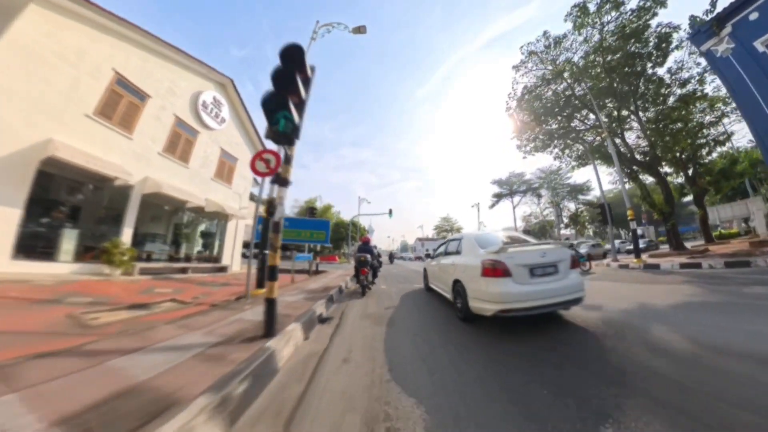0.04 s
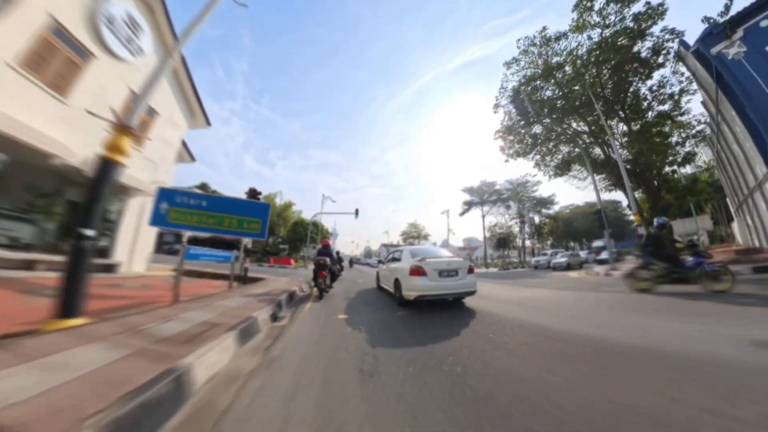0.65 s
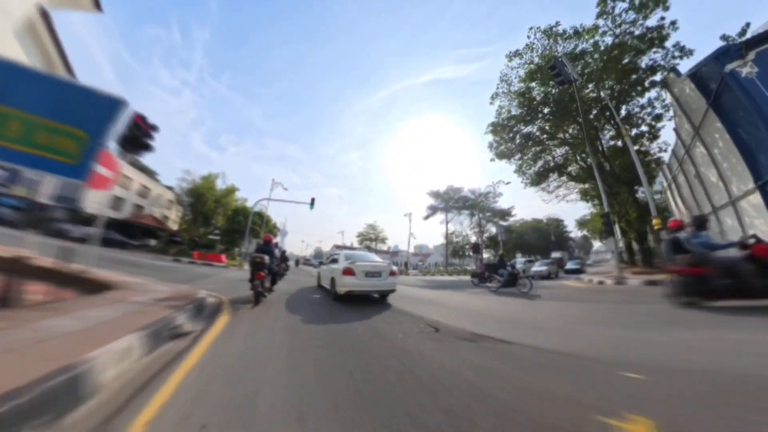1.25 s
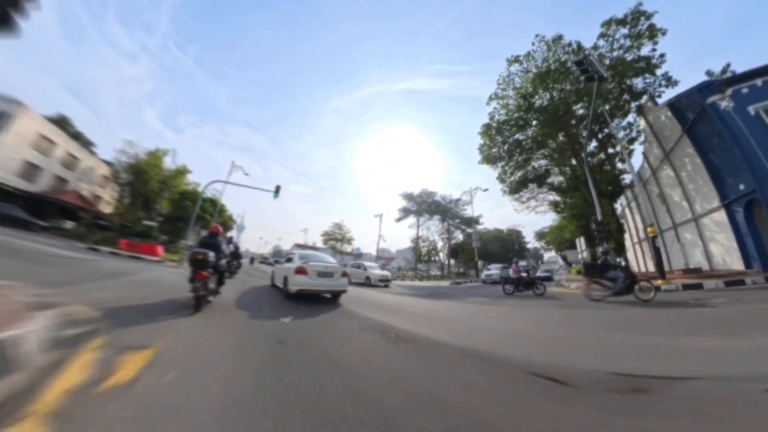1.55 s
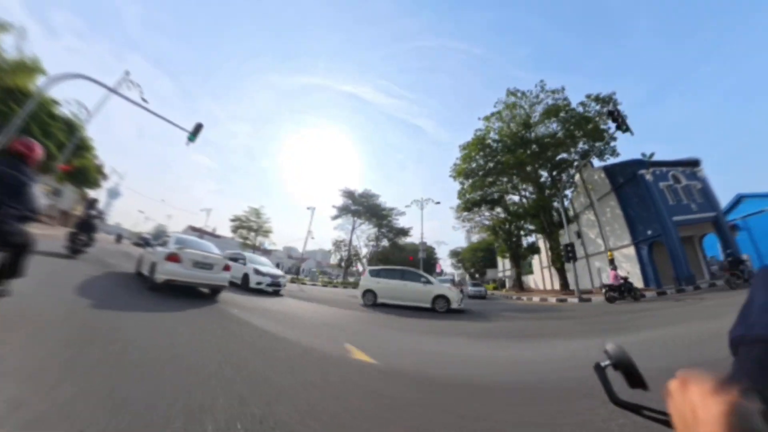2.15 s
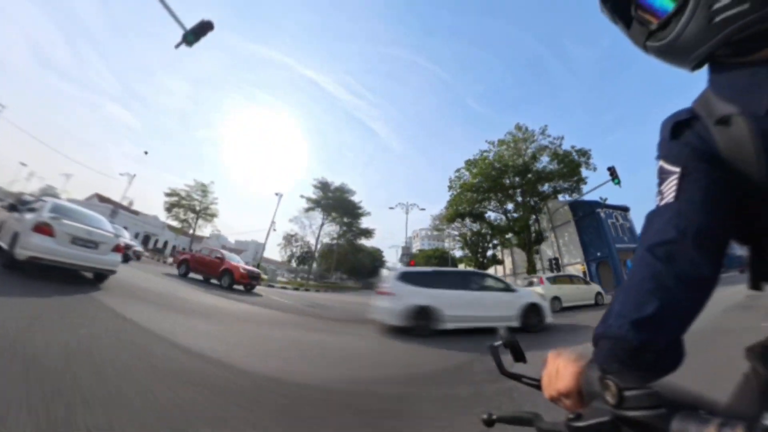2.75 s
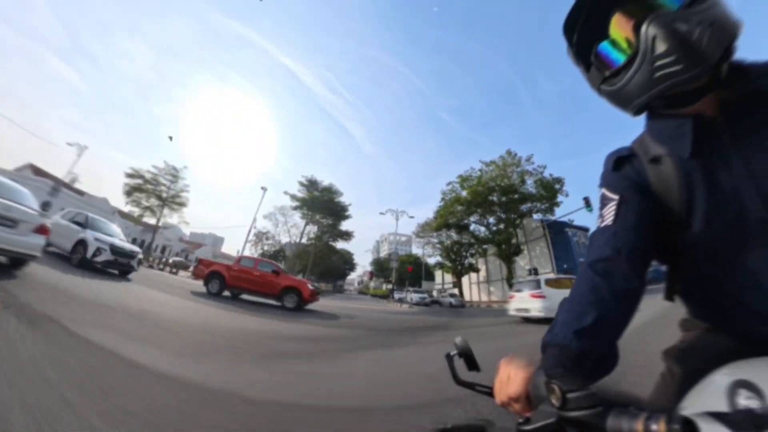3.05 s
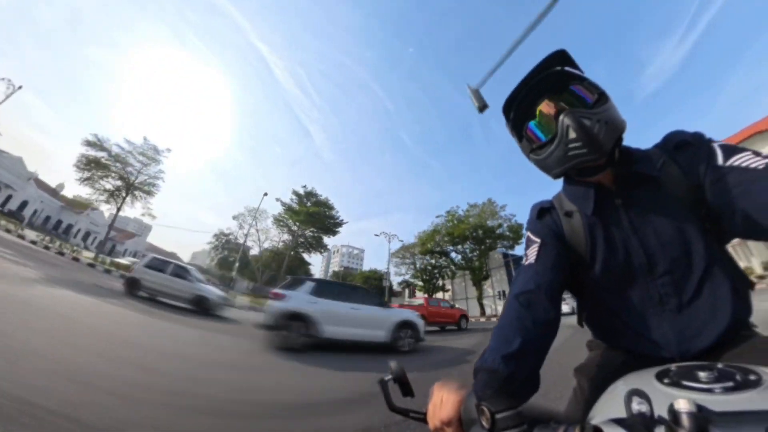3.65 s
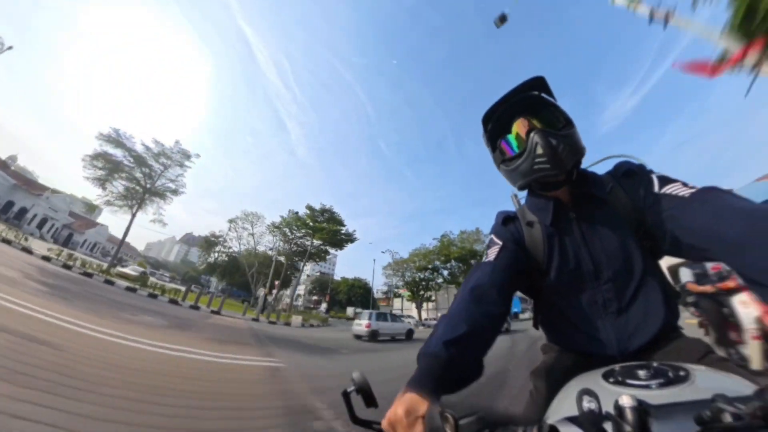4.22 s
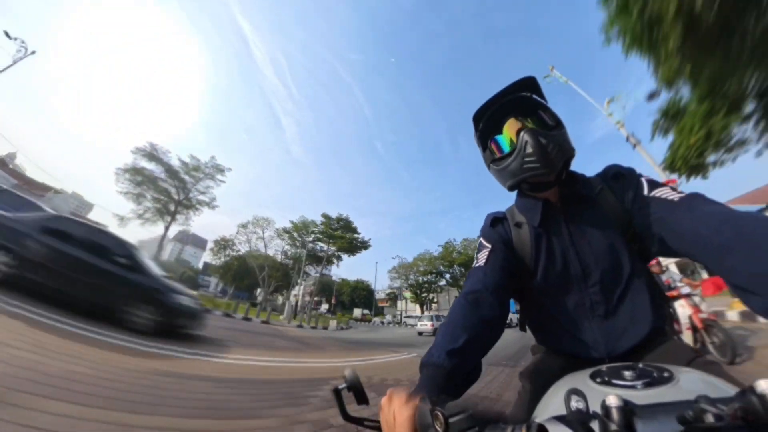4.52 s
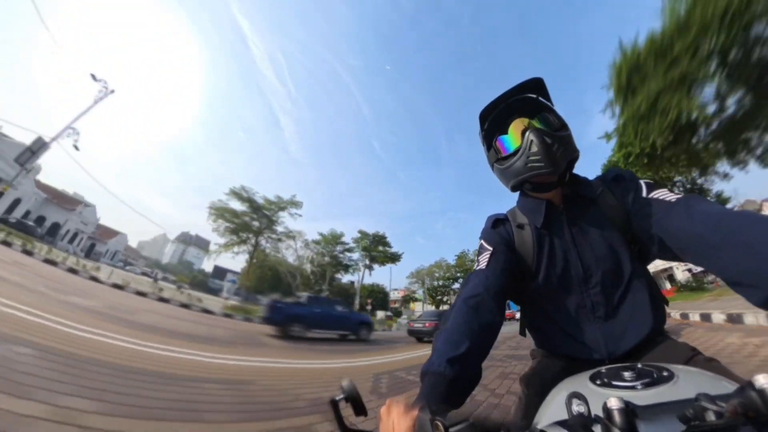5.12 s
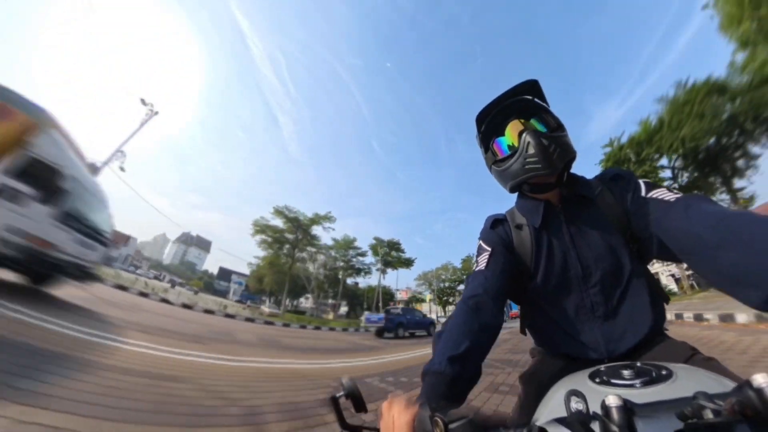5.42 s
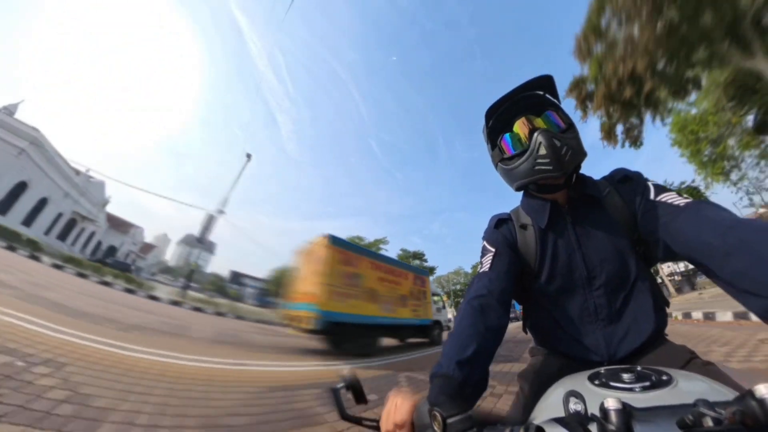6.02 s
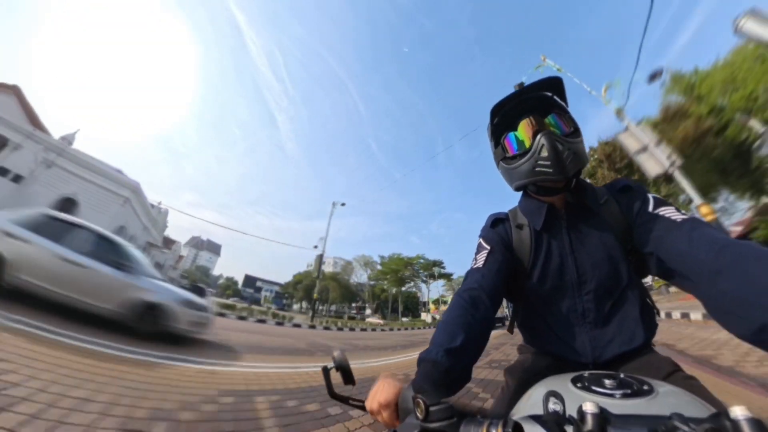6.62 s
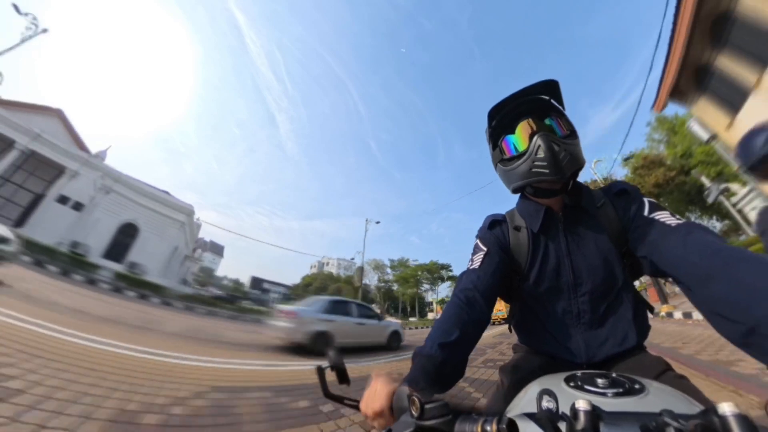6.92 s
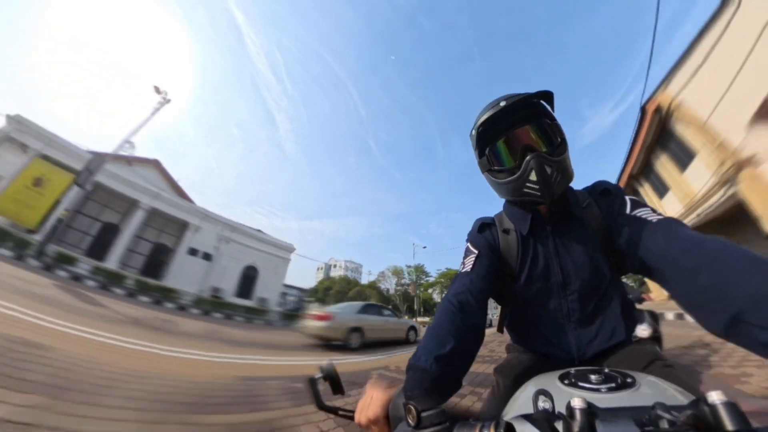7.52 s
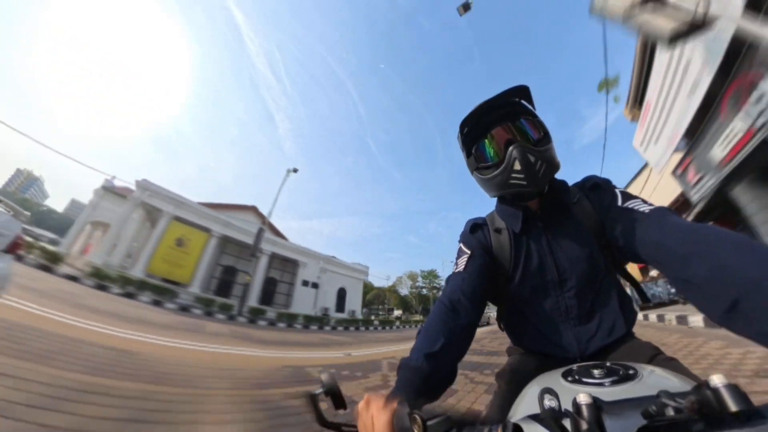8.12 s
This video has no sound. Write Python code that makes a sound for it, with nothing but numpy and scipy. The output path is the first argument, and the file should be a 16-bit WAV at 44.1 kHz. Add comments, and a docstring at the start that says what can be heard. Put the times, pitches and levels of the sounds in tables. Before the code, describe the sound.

A motorcycle pulls away along a town road, its booming exhaust climbing in pitch and dropping at each of three upshifts, with light engine clatter. Another motorcycle and a whining scooter are briefly near at the start. As speed builds, wind buffets and flutters on the handlebar microphone, the tyres drum on block paving, and oncoming traffic swishes past.

```python
"""A booming exhaust climbs in pitch as a motorcycle pulls away and shifts up three times, heard from its
handlebar. Harmonics of the engine cycle sweep through the pipe's resonances while the case clatters.
Another motorcycle and a scooter are briefly near, and oncoming traffic swishes by. Turbulence buffets
the microphone harder as speed builds, its mount sways, and dull puffs flutter in the rush. The tyres
roar and drum on block paving. A limiter holds the peaks down."""
import sys
import numpy as np
from scipy import signal
from scipy.fft import rfft, irfft, next_fast_len
from scipy.io import wavfile
from scipy.ndimage import uniform_filter1d, minimum_filter1d, map_coordinates

SR = 44100
rng = np.random.default_rng(int(sys.argv[2]) if len(sys.argv) > 2 else 0)


def file_out(sig):
    """Save sig as 16-bit WAV at sys.argv[1]."""
    # one column per channel
    cols = np.atleast_2d(sig).T
    # limit, then scale
    lim = np.clip(cols, -1, 1)
    pcm = np.round(lim * 32767).astype(np.int16)
    wavfile.write(sys.argv[1], SR, pcm)


N = 368676
t = np.arange(N) / SR


def amp(db):
    """Decibels as an amplitude ratio."""
    return 10 ** (np.asarray(db) / 20)


def unit(x):
    """Normalisation to rms 1."""
    return x / np.sqrt(np.mean(x ** 2) + 1e-20)


def step(x, middle, width):
    """A smooth rise from 0 to 1 as x passes the middle."""
    return (1 + np.tanh((x - middle) / width)) / 2


def along(points, hz):
    """Interpolation of (frequency, value) points on a log axis."""
    f, v = np.transpose(points)
    return np.interp(np.log(hz + 1e-6), np.log(f), v)


def curves(rows):
    """Linear interpolation in time: one curve for each column after the first."""
    times, *columns = np.transpose(rows)
    return [np.interp(t, times, column) for column in columns]


def wobble(rate):
    """A smooth random curve with rate knots a second."""
    return map_coordinates(rng.standard_normal(int(N * rate / SR) + 4), [np.arange(N) * rate / SR])


def eddies(rate, limit=1.6):
    """Soft saturation of a random curve: no single eddy stands far out."""
    return limit * np.tanh(wobble(rate) / limit)


def bursts(cycles, decay, floor):
    """Exponential decay, restarted once a cycle and lasting a share of it."""
    return unit(np.exp(-(cycles % 1) / decay) + floor)


def filtered(x, response):
    """Linear filtering: the spectrum times a complex frequency response."""
    size = next_fast_len(N + SR // 2)
    return irfft(rfft(x, size) * response(np.fft.rfftfreq(size, 1 / SR)), size)[:N]


def noise(spectrum, drive=1):
    """Source and filter: noise modulated by drive, coloured, and rolled off above the last point."""
    colour = lambda hz: amp(along(spectrum, hz)) * np.maximum(hz / spectrum[-1][0], 1) ** -6
    return unit(filtered(drive * rng.standard_normal(N), colour))


def patchy(x, depth_db):
    """Modulation in time and frequency: eddies lift and drop patches of the spectrum."""
    spectra = signal.stft(x, nperseg=512)[2]
    field = uniform_filter1d(rng.standard_normal(spectra.shape), size=9, axis=0)
    field = uniform_filter1d(field, size=12, axis=1)
    return unit(signal.istft(spectra * amp(depth_db * unit(field)), nperseg=512)[1][:N])


# Passing swishes. Each row: time in seconds, centre in Hz, level in dB.
SWISH_EVENTS = [(2.33, 4400, -53), (4.9, 1800, -34.5), (5.28, 1970, -38.5), (5.48, 2130, -35.5),
                (5.78, 2070, -35.5), (6.15, 2310, -37), (7.2, 2340, -40.5), (7.42, 3070, -41.5),
                (7.95, 2510, -41.5)]


def swishes(half_length_s=0.065, relative_width=0.18, gusty_db=2):
    """Band-limited flow noise swells and fades as oncoming traffic and side gusts pass."""
    sound = np.zeros(N)
    for s, centre_hz, db in SWISH_EVENTS:
        response = lambda hz: 1 / (1 + ((hz / centre_hz - 1) / relative_width) ** 2)
        band = unit(filtered(rng.standard_normal(N), response))
        swell = np.exp(-((t - s) / half_length_s) ** 2)
        sound += amp(db + gusty_db * eddies(45)) * swell * band
    return sound


# The scooter's drive. Each row: time in seconds, pitch in Hz, level in dB.
SCOOTER_WHINE = [(.1, 960, -46), (.58, 932, -34.5), (.8, 890, -36), (1.05, 867, -35), (1.3, 884, -32),
                 (1.7, 870, -46)]


def scooter():
    """Random frequency and amplitude modulation blur a transmission whine that sags and picks up."""
    hz, db = curves(SCOOTER_WHINE)
    turns = np.cumsum(hz * (1 + .014 * wobble(110))) / SR
    return amp(db) * (1 + .3 * wobble(50)) * np.sin(2 * np.pi * turns)


# The nearby engine. Each row: time in seconds, cycle rate in Hz, level in dB.
OTHER_ENGINE = [(0, 39.3, -23.5), (.35, 39.98, -19), (.6, 40.23, -20), (.9, 40.44, -18.5),
                (1.15, 41.4, -19), (1.5, 39.4, -39.5), (2, 38.6, -82)]
# Its exhaust. Each row: harmonic number, level in dB.
OTHER_HARMONICS = [(2, -10), (4, 0), (5, -10), (8, -13), (9, -14), (10, -15)]


def other_motorcycle(rasp_db=-24):
    """Periodic firing of a single cylinder gives a harmonic series, with a rasp on every pulse."""
    rate_hz, db = curves(OTHER_ENGINE)
    cycles = np.cumsum(rate_hz) / SR
    note = sum(amp(level) * np.sin(2 * np.pi * (k * cycles + rng.random()))
               for k, level in OTHER_HARMONICS)
    firings = bursts(cycles, decay=0.5, floor=0.11)
    rasp = noise([(800, -4), (2000, 6), (4700, 0), (7000, -16), (12000, -28)], firings)
    return amp(db) * (unit(note) * (1 + 0.15 * wobble(16)) + amp(rasp_db) * rasp)


# Dull puffs in the rushing noise, single or in quick fluttering runs.
# Each row: start in seconds, level in dB, length in seconds.
RUSH_PUFFS = [(.816, -26, .03), (2.677, -30, .34), (3.11, -22, .03), (4.04, -21, .03), (4.391, -27, .03),
              (4.601, -18, .03), (4.67, -25, .07), (4.806, -18, .03), (4.902, -22.5, .28),
              (5.238, -19.5, .03), (5.409, -20, .03), (5.51, -23.5, .1), (5.669, -21, .03),
              (5.76, -30, .03), (5.86, -21, .03), (5.985, -21.5, .03), (6.12, -25, .03), (6.18, -23, .03),
              (6.258, -22, .07), (6.517, -26, .03), (6.937, -25, .1), (7.281, -33, .03), (7.445, -24, .07),
              (7.643, -22, .03), (7.944, -35, .07), (8.107, -25, .03), (8.17, -19.5, .03),
              (8.234, -28, .14)]
# The mount's random sway. Each row: frequency in Hz, spectral density in dB.
SWAY_SPECTRUM = [(10, -18), (20, -6), (29, 0), (42, -8), (70, -16)]


def sway_and_puffs(natural_hz=29, skew=0.63):
    """Resonance: the mount sways near its natural frequency, at random or in step with dull puffs."""
    sway, envelope = np.tanh(noise(SWAY_SPECTRUM)), np.zeros(N)
    for s, db, length_s in RUSH_PUFFS:
        swings = (t - s) * natural_hz
        on = (swings >= 0) & (swings < max(round(length_s * natural_hz), 1))
        swing = np.sin(np.pi * (swings[on] % 1) ** skew) ** 2
        sway[on], envelope[on] = 2 * swing - 1, amp(db) * swing ** 2
    puffs = envelope * noise([(250, -5), (500, 4.5), (900, -1.5), (1300, -11.5), (2200, -17)])
    return uniform_filter1d(sway, size=130), puffs


# Tyre roar and drumming on the blocks. Each row: frequency in Hz, spectral density in dB.
TYRE_SPECTRUM = [(400, -6), (750, 2), (1000, 0), (1400, -1), (2000, -8)]
PAVING_SPECTRUM = [(350, -11.5), (500, 3.5), (850, -1), (1150, -8.5), (1700, -15.5)]


def tyres(speed, sway, open_road, rolling_db=-35, paving_db=-32, sway_db=4):
    """Rolling noise grows with speed; the mount's sway modulates the drumming on the paving."""
    rolling = amp(rolling_db) * speed * noise(TYRE_SPECTRUM)
    drumming = amp(paving_db) * open_road * noise(PAVING_SPECTRUM, amp(sway_db * sway))
    return rolling + drumming


# Layers of wind noise, low to high, then its crackle. Each row: frequency in Hz, spectral density in dB.
BUFFET_SPECTRUM = [(5, -13), (15, -5), (27, 3.5), (45, -2), (80, -7.5), (200, -45.5)]
ROAR_SPECTRUM = [(20, -21.5), (45, -3), (75, 7.5), (120, 6.5), (165, 6), (210, -1.5), (260, -5),
                 (400, -24.5)]
RUSH_SPECTRUM = [(120, -6.5), (280, 3.5), (400, 2), (520, -1), (800, -4.5), (1100, -10.5), (1500, -17),
                 (2200, -26)]
HISS_SPECTRUM = [(700, -2.5), (1300, 0.5), (2000, 0), (2800, -3.5), (4000, -11.5), (5500, -22.5),
                 (7500, -33.5)]
SIZZLE_SPECTRUM = [(2000, -22.5), (4000, 2.5), (6000, -1), (8000, -5), (10000, -8), (11500, -14.5),
                   (13000, -24)]
CRACKLE_SPECTRUM = [(500, -3), (1400, 2), (3000, -3), (5000, -19)]
# Gusts and vehicle wakes. Each row: time and half length in seconds, change of rush, hiss, sizzle in dB.
GUSTS_AND_WAKES = [(.05, 0.23, 4, 11, 1), (0.523, 0.053, 2.5, 8, 0.5), (0.902, 0.2, 2, 10, 4),
                   (1.075, .04, 0.5, 1.5, 2.5), (2.297, .12, -.5, 1.5, 1.5), (4.3, 0.19, -0.5, -1, -3),
                   (4.749, 0.043, 3, -1, 4), (4.881, 0.3, -1, -0.5, -1), (5.323, 0.07, -4, -1, 3.5),
                   (5.615, 0.064, 1.5, -2.5, -3), (6.009, 0.11, -3.5, 3, -2),
                   (6.286, 0.054, 2.5, -1.5, -6.5), (6.44, 0.072, -0.5, 3.5, 6), (6.675, .08, -4, 3.5, 7.5),
                   (6.883, 0.065, 2, 2.5, 11), (7.118, 0.064, 1.5, 3.5, -2.5), (7.58, 0.099, -1, 2.5, 12.5),
                   (8.23, 0.062, -3, -4.5, 3)]


def wind(speed, sway, open_road, shelter_db=-3.5, sway_rush_db=2.6, sway_hiss_db=2.5):
    """Turbulent pressure: slow eddies thump the microphone, fast ones make it flutter and crackle."""
    def level_db(base_db, per_doubling_db, open_road_db):
        return base_db + per_doubling_db * np.log2(speed) + open_road_db * open_road

    sheltered = 1 - step(t, 1.5, 0.13)  # a corner building keeps the low roar down at first
    buffet_db = level_db(-17, 2.8, 2.3)
    roar_db = level_db(-11, 1.6, -5.5) + shelter_db * sheltered
    rush_db = level_db(-19, 3.74, -5.5)
    hiss_db = level_db(-45, 0.27, 8.2)
    sizzle_db = level_db(-56, -2.5, -.5) - 9.5 * np.maximum(t - 5.95, 0)  # the top dulls near the end
    for s, half_length_s, more_rush_db, more_hiss_db, more_sizzle_db in GUSTS_AND_WAKES:
        swell = np.exp(-((t - s) / half_length_s) ** 2)
        rush_db += more_rush_db * swell
        hiss_db += more_hiss_db * swell
        sizzle_db += more_sizzle_db * swell
    gust, flutter = eddies(24), eddies(260)
    buffet = amp(buffet_db) * noise(BUFFET_SPECTRUM, amp(eddies(11)))
    roar = amp(roar_db) * noise(ROAR_SPECTRUM)
    # Turbulence deepens with speed; each swing of the mount lifts the rush and starves the hiss.
    rush = amp(rush_db) * noise(RUSH_SPECTRUM, amp(speed * (sway_rush_db * sway + 2 * flutter)))
    flicker_db = speed * (1.4 * gust + 1.1 * eddies(200)) - sway_hiss_db * open_road * sway
    hiss = amp(hiss_db) * patchy(noise(HISS_SPECTRUM, amp(flicker_db)), depth_db=1.46)
    sizzle = amp(sizzle_db) * noise(SIZZLE_SPECTRUM, amp(speed * 2.4 * gust + 2 * flutter))
    strongest_eddies = np.maximum(flutter - .6, 0)
    crackle = amp(-42.5) * speed * noise(CRACKLE_SPECTRUM, strongest_eddies)
    return buffet + roar + rush + hiss + sizzle + crackle


BLIP_S, BLIP_LENGTH_S, BLIP_DB = 2.06, .22, 2.5  # a blip of throttle ends the slow first shift
# One pull per gear. Each row: throttle opening and closing in seconds, first and last four-stroke
# cycle rate in Hz, exponent of the climb (1 is straight).
GEAR_PULLS = [(0, 1.8, 16.5, 36.1, 1.17), (2.26, 4.1, 27.7, 39.7, 1), (4.48, 7.7, 31.5, 42.1, 1.37),
              (8.08, 8.4, 34.4, 34.5, 1)]


def gearbox(sag_hz=4.2, grip_turn_s=0.063):
    """Gearing ties road speed to the revs in a pull; in a shift the revs sink and the bike coasts."""
    rate_hz, progress, in_gear = np.zeros(N), np.zeros(N), np.zeros(N)
    shut_s, shut_hz = -1, GEAR_PULLS[0][2]
    for opens, closes, first_hz, last_hz, bend in GEAR_PULLS:
        shift = (t >= shut_s) & (t < opens)
        sunk = ((t[shift] - shut_s) / (opens - shut_s)) ** 2
        rate_hz[shift] = shut_hz + (first_hz - shut_hz) * sunk
        progress[shift] = 1 - sunk
        pull = (t >= opens) & (t < closes)
        in_gear[pull] = 1
        progress[pull] = (t[pull] - opens) / (closes - opens)
        rate_hz[pull] = first_hz + (last_hz - first_hz) * progress[pull] ** bend
        shut_s, shut_hz = closes, last_hz
    speed = np.exp(np.cumsum(in_gear * np.gradient(np.log(rate_hz))))
    # In the first shift the revs sag further, until the blip catches them.
    first_shut_s, second_opens_s = GEAR_PULLS[0][1], GEAR_PULLS[1][0]
    caught = step(t, BLIP_S, .012)
    rate_hz -= sag_hz * np.clip((t - first_shut_s) / (BLIP_S - first_shut_s), 0, 1) * (1 - caught)
    grip = np.maximum(in_gear, caught * (t < second_opens_s))
    throttle = uniform_filter1d(grip, int(grip_turn_s * SR))
    return rate_hz, throttle, progress, speed / speed.max()


# Load in gears one to four. Each row: exhaust, intake and throb levels in dB, roughness from 0 to 1.
LOAD_PER_GEAR = [(-13, -27, -16, 0.33), (-16.5, -20.5, -21, 0.24), (-15, -13, -21, 0.23),
                 (-16, -28, -36.5, .2)]


def engine_load():
    """Load sets the strength of the sources: held through each pull, gliding across the shifts."""
    return curves([(s, *load) for pull, load in zip(GEAR_PULLS, LOAD_PER_GEAR) for s in pull[:2]])


# Modes of the crankcase and cylinder head. Each row: frequency in Hz, bandwidth in Hz, gain in dB.
CASE_MODES = [(397, 54, 7), (945, 157, -1), (1370, 240, -1), (2100, 1000, -11.5), (4080, 1470, -18.5)]


def clatter(cycles, speed, mesh_db=-12, mesh_orders=(48, 60), knots=450):
    """Forced vibration: valves, piston and meshing gear teeth excite the modes of the engine case."""
    def case(hz):
        return sum((-1) ** k * amp(db) * 1j * hz * width / (centre ** 2 - hz ** 2 + 1j * hz * width)
                   for k, (centre, width, db) in enumerate(CASE_MODES))

    repeating = map_coordinates(rng.standard_normal(knots), [cycles % 1 * knots], mode="grid-wrap")
    knocks = bursts(2 * cycles, decay=0.44, floor=0.26) * rng.standard_normal(N)  # one per crank turn
    teeth = amp(mesh_db) * sum(np.sin(2 * np.pi * k * cycles) for k in mesh_orders)
    level_db = np.minimum(-47.5 - 13.5 * np.log2(speed), -32)  # the engine labours most pulling away
    return amp(level_db) * unit(filtered(repeating + knocks + teeth, case))


def throb(cycles, progress, full_db, rise_db=16.5, roughness=0.12, octave_db=-4):
    """Unbalance shakes the machine once per crank turn, twice a cycle; the pistons add the octave."""
    level_db = full_db - rise_db * (1 - progress) ** 2  # grows through each pull
    crank = (1 + roughness * wobble(25)) * np.sin(2 * np.pi * 2 * cycles)
    pistons = (1 + roughness * wobble(25)) * np.sin(2 * np.pi * 4 * cycles)
    return amp(level_db) * unit(crank + amp(octave_db) * pistons)


def intake(cycles, rate_hz, load_db, tuning_hz=103.5, off_tune_db=-16):
    """Airbox resonance: the third harmonic booms once it climbs past the tuning."""
    boom = unit((1 + 0.28 * wobble(45)) * np.sin(2 * np.pi * 3 * cycles + .25 * wobble(45)))
    below_tuning = 1 - step(3 * rate_hz, tuning_hz, 2)
    return amp(load_db + off_tune_db * below_tuning) * boom


# Harmonics favoured by uneven firing. Each row: harmonic number, level in dB.
FIRING_HARMONICS = [(1, -6), (2, -6), (3, -6), (4, -5.5), (5, -1), (6, 1.5), (7, -4), (8, -2.5), (9, -3),
                    (10, -8), (14, -11)]
# Response of the pipe and silencer. Each row: frequency in Hz, gain in dB.
PIPE_RESPONSE = [(20, -18), (55, -7), (90, -9), (120, -7), (138, -2.5), (165, 0), (200, 0), (222, -2.5),
                 (248, -7.5), (280, -18), (320, -7), (350, -9), (385, -20), (450, -26), (900, -30)]


def exhaust(cycles, rate_hz, throttle, load_db, roughness, shut_db=-7, muffle_hz=32.06):
    """Pipe resonance lifts each harmonic of the cycle rate in turn as the revs sweep it through."""
    note = np.zeros(N)
    for k in range(1, 15):
        gain = amp(along(PIPE_RESPONSE, k * rate_hz) + along(FIRING_HARMONICS, k))
        uneven = 1 + roughness * wobble(24)  # no two firings are alike
        note += gain * uneven * np.sin(2 * np.pi * (k * cycles + rng.random()))
    muffle_db = 0.5 * np.maximum(rate_hz - muffle_hz, 0)  # the silencer takes more at high revs
    blip = step(t, BLIP_S, .012) - step(t, BLIP_S + BLIP_LENGTH_S, .03)
    return amp(load_db + shut_db * (1 - throttle) - throttle * muffle_db + BLIP_DB * blip) * unit(note)


def overrun(cycles, roughness, burble_db=-26.5, drone_db=-20):
    """With the throttle shut, pipe resonance colours a noisy burble and the fourth harmonic drones."""
    burble = noise(PIPE_RESPONSE)
    drone = unit((1 + roughness * wobble(24)) * np.sin(2 * np.pi * 4 * cycles))
    return amp(burble_db) * burble + amp(drone_db) * drone


def scene():
    """Superposition: revs drive the engine, speed drives tyres and wind, and the mount chops both."""
    rate_hz, throttle, progress, speed = gearbox()
    waver = 0.001465 + .013 * (1 - speed) ** 2  # the revs are least steady at low speed
    rate_hz = rate_hz * (1 + waver * wobble(14))
    cycles = np.cumsum(rate_hz) / SR
    exhaust_db, intake_db, throb_db, roughness = engine_load()
    open_road = step(t, 4.615, 0.13)  # past the junction: block paving and a headwind
    sway, puffs = sway_and_puffs()
    bike = exhaust(cycles, rate_hz, throttle, exhaust_db, roughness)
    bike += throttle * intake(cycles, rate_hz, intake_db)
    bike += (1 - throttle) * overrun(cycles, roughness)
    bike += throttle * throb(cycles, progress, throb_db)
    bike += clatter(cycles, speed)
    street = other_motorcycle() + scooter() + tyres(speed, sway, open_road) + swishes()
    return (bike + street + puffs + wind(speed, sway, open_road))[None]


def record(dry, drive_db=0.5, ceiling=.67, window_samples=360, top_hz=12800):
    """Look-ahead limiting lowers the gain around each peak; a low-pass filter then limits the band."""
    x = dry[0] * amp(drive_db)
    needed = ceiling / np.maximum(np.abs(x), ceiling)
    gain = uniform_filter1d(minimum_filter1d(needed, window_samples), window_samples)
    return filtered(x * gain, lambda hz: hz < top_hz)[None]


dry = scene()
out = record(dry)
file_out(out)
```